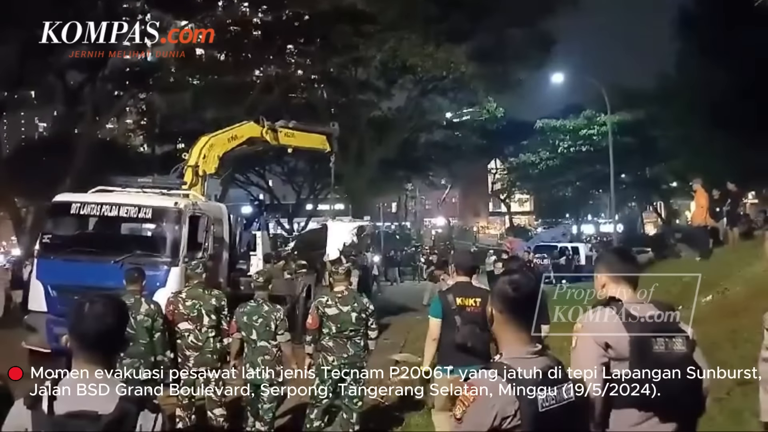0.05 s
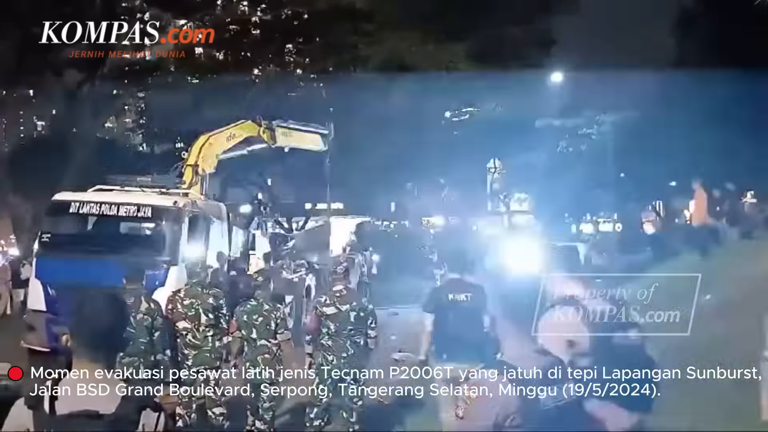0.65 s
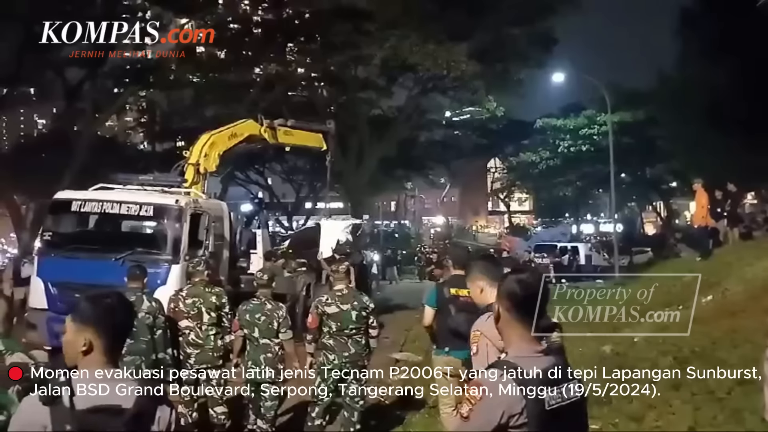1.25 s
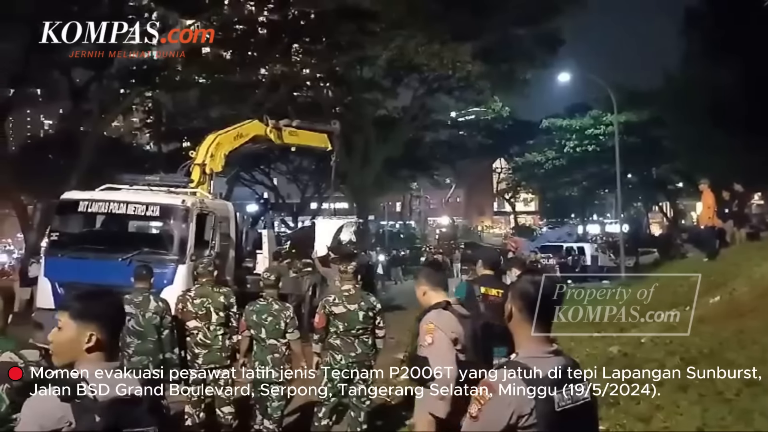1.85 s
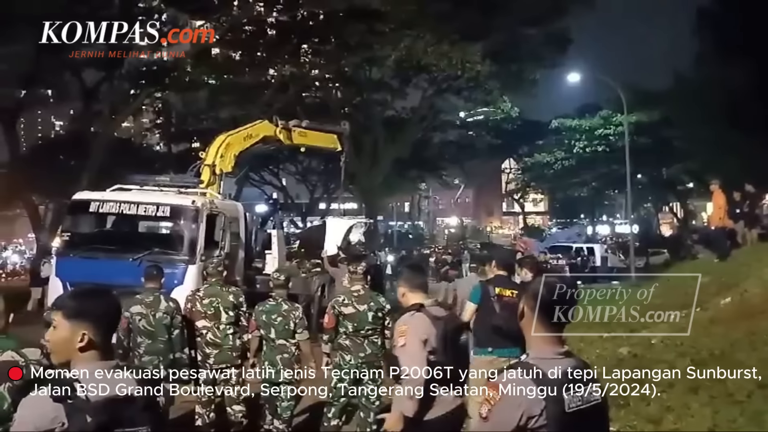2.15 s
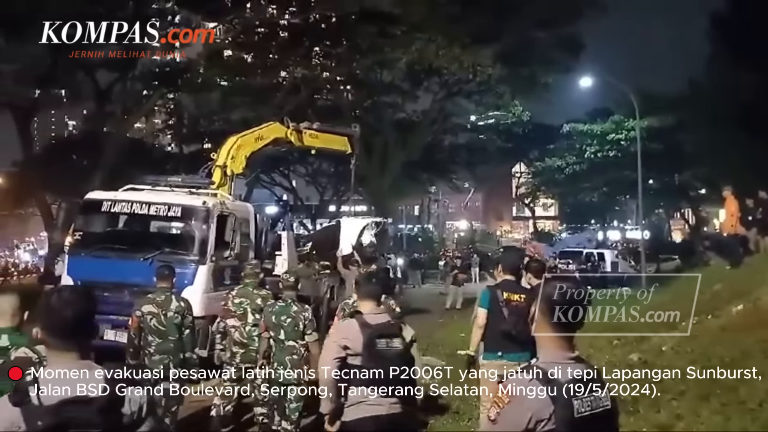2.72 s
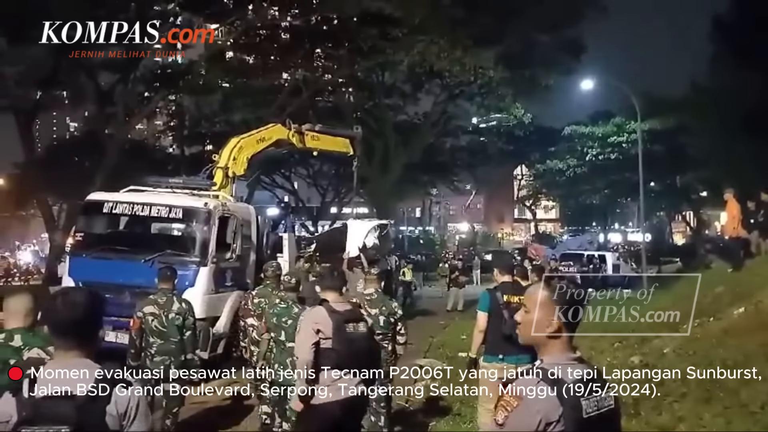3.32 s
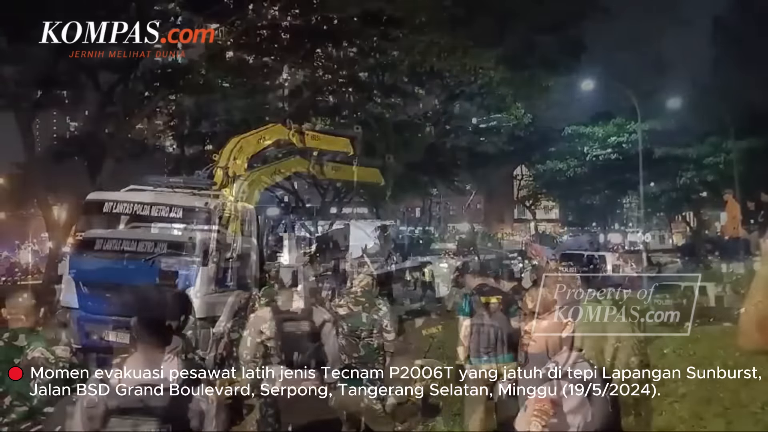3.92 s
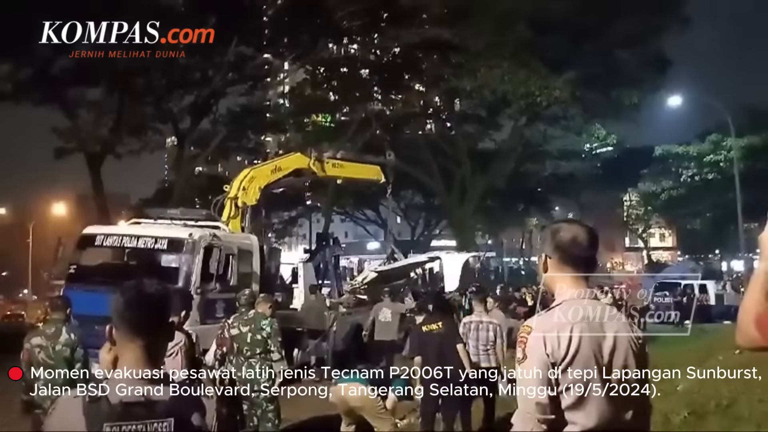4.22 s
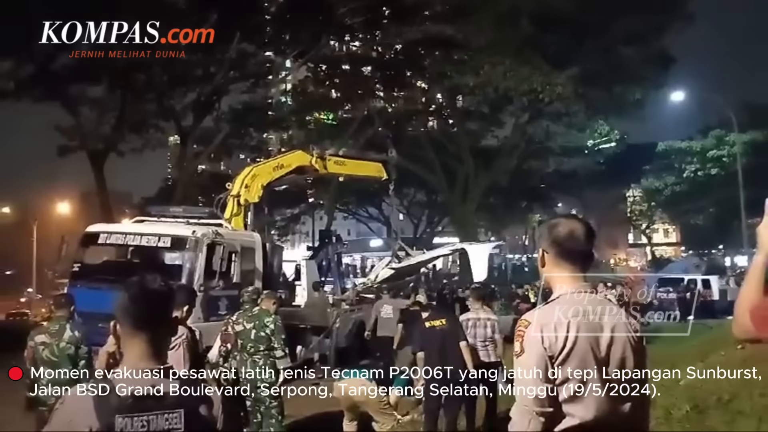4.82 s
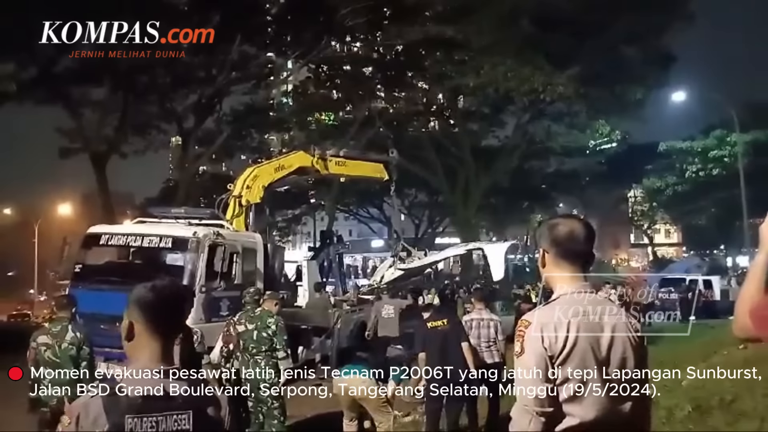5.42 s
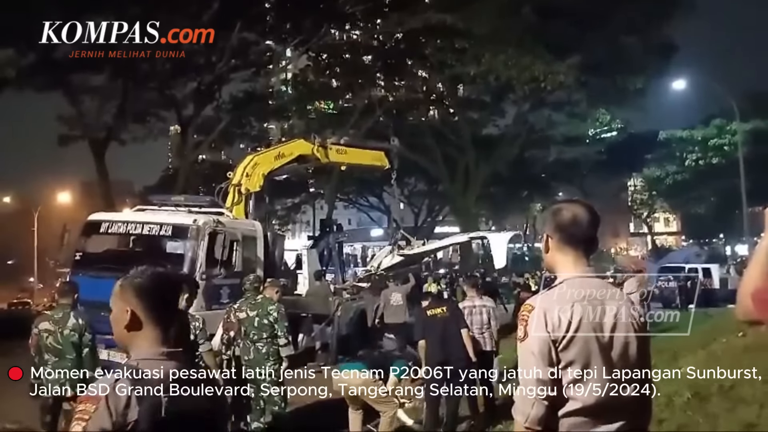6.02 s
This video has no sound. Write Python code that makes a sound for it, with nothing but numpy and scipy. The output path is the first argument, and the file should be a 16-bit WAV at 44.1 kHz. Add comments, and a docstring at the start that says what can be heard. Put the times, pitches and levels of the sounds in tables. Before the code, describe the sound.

Heard outdoors and a little to the right, a diesel truck drones with a booming exhaust, clatter and hiss as its crane lifts wreckage. Thin whistles, a brush of cloth close by, a short squeak and a dull scrape sit under the drone. After a sudden, brief silence, the engine returns from another microphone position, slowed by the load, then regains speed amid another squeak, a scrape and two small clicks.

```python
"""A crane truck's six-cylinder diesel drones at fast idle, slowing under load and picking up again.
The exhaust booms at the firing rate, the block clatters, and the fan and hydraulics hiss. Tones tied to
the crankshaft swell where the truck's panels ring. Valves whistle, the crane squeaks, wreckage scrapes,
and a rustle and two ticks sound close by. It is heard outdoors from one spot, then, after a short
silence, from a second one."""
import sys
import numpy as np
from scipy import signal
from scipy.fft import rfft, irfft, next_fast_len
from scipy.io import wavfile

SR = 44100
rng = np.random.default_rng(int(sys.argv[2]) if len(sys.argv) > 2 else 0)


def pcm_store(signal):
    """Save signal as 16-bit PCM."""
    levels = np.round(np.clip(np.atleast_2d(signal), -1, 1) * 32767)
    wavfile.write(sys.argv[1], SR, levels.astype(np.int16).T)


N = 266981
TIME = np.arange(N) / SR

# which ear hears the truck louder, per spot: f/Hz, left minus right/dB
TRUCK_BALANCE = ([(120, -3.5), (450, -3), (720, -6.0), (1120, -9), (1550, 0.3), (2400, -7), (3500, -9),
                 (6200, -8.5), (7600, -6.4), (11500, -9.5), (14500, 1)], [(120, 1), (450, -5.5), (720, -2),
                 (1120, -7.5), (1550, -2), (2400, -4.5), (3500, -6.5), (6200, -5.5), (7600, -6.5),
                 (11500, -10.5), (14500, -13)])
IDLE_TURNS_PER_S = (39.0, 40.85)   # the crank speed that the governor aims for, per spot


def from_db(db):
    """Turn decibels into a gain."""
    return 10 ** (np.asarray(db) / 20)


def rms_one(x):
    """Scale a signal to an average strength (rms) of 1."""
    return x / np.sqrt(np.mean(x ** 2) + 1e-20)


def in_time(rows):
    """Join a table's timed points with straight lines, one curve per column."""
    times, *columns = np.transpose(rows)
    return [np.interp(TIME, times, column) for column in columns]


def at_hz(points, hz):
    """Read a table between its points, with frequency spaced in octaves."""
    points = np.array(points)
    return np.interp(np.log(hz), np.log(points[:, 0]), points[:, 1])


def pan(balance_db):
    """Left and right gains of constant power; below 0 dB the right is louder."""
    gains = from_db(np.array([[.5], [-.5]]) * balance_db)
    return gains / np.sqrt(np.mean(gains ** 2, axis=0))


def swell(at_s, width_s):
    """A bell-shaped rise and fall."""
    return np.exp(-((TIME - at_s) / width_s) ** 2)


def drift(rate_hz):
    """A smooth random wobble of typical size 1."""
    step = 40   # samples between random values
    pole = np.exp(-2 * np.pi * rate_hz * step / SR)
    noise = rng.standard_normal(N // step + 2002)
    slow = signal.lfilter([1], [1, -2 * pole, pole * pole], noise)[2000:]
    return np.interp(np.arange(N) / step, np.arange(len(slow)), rms_one(slow))


def resonant_noise(hz, sharpness):
    """Noise ringing around one pitch; more sharpness (Q) makes it more like a tone."""
    peak = signal.iirpeak(hz, sharpness, fs=SR)
    return rms_one(signal.lfilter(*peak, signal.lfilter(*peak, rng.standard_normal(N))))


def stereo_noise(spectrum, balance, lead_s=0):
    """Shaped noise, alike in both ears in the bass and unlike in the treble."""
    # how alike the two ears are: f/Hz, likeness (1 = the same)
    likeness = [(130, .99), (290, 0.82), (640, 0.87), (1000, .45), (1500, 0.049), (7000, .02)]
    size = next_fast_len(N)
    hz = np.maximum(np.fft.rfftfreq(size, 1 / SR), 1)
    mid, side = rfft(rng.standard_normal((2, size)))
    alike = at_hz(likeness, hz)
    ears = np.sqrt(1 + alike) * mid + np.sqrt(1 - alike) * side * [[1], [-1]]
    ears[0] *= np.exp(2j * np.pi * hz * lead_s)   # the left ear hears it earlier
    ears *= from_db(at_hz(spectrum, hz)) * pan(at_hz(balance, hz))
    return rms_one(irfft(ears, size)[:, :N])


def valve_whistles():
    """Oil forced through valves makes thin bands of noise that come and go."""
    # whistles: t/s, half length/s, f/Hz, sharpness, level/dB
    whistles = [(1.25, .6, 4640, 55, -46.5), (2.95, 0.35, 4600, 40, -52), (2.6, 0.69, 6400, 24, -46.5),
                (4.6, .45, 12500, 5, -53.5)]
    out = np.zeros((2, N))
    for at_s, width_s, hz, sharpness, db in whistles:
        ears = np.array([resonant_noise(hz, sharpness) for _ in range(2)])
        out += from_db(db) * swell(at_s, width_s) * ears
    return out * pan(-12.5)


def crane_squeaks():
    """The load shifts on the crane with short, falling squeaks."""
    # squeaks: t/s, half length/s, start f/Hz, end f/Hz, level/dB
    squeaks = [(0.236, 0.1, 738, 715, -42.5), (2.552, 0.062, 829, 765, -34.5),
               (4.076, 0.061, 614, 606, -34), (4.09, 0.035, 1560, 1520, -43)]
    out = np.zeros(N)
    for at_s, width_s, start_hz, end_hz, db in squeaks:
        hz = np.interp(TIME, [at_s - width_s, at_s + width_s], [start_hz, end_hz])
        out += from_db(db) * swell(at_s, width_s) * np.sin(2 * np.pi * np.cumsum(hz) / SR)
    return out * pan(-5.5)


def wreckage_scrapes():
    """Wreckage scrapes dully, ringing around two pitches."""
    # scrapes: t/s, half length/s, low f/Hz, high f/Hz, level/dB
    scrapes = [(3.252, 0.019, 473.6, 865, -29.5), (3.291, 0.022, 535, 955, -30.5),
               (4.83, 0.075, 595, 766, -36)]
    out = np.zeros(N)
    for at_s, width_s, low_hz, high_hz, db in scrapes:
        body = resonant_noise(low_hz, sharpness=4.4) + 0.69 * resonant_noise(high_hz, sharpness=4.0)
        out += from_db(db) * swell(at_s, width_s) * rms_one(body)
    return out * pan(-5.0)


def cloth_rustle(at_s, rise_s, decay_s, level_db):
    """A bright brush of cloth on the right that dies away."""
    # tone colour of the cloth: f/Hz, relative level/dB
    spectrum = [(3000, -22.5), (6000, 0), (9000, -8), (12000, 2), (15000, -9), (18000, -17)]
    age = np.maximum(TIME - at_s, 0)
    shape = np.minimum(age / rise_s, 1) * np.exp(-age / decay_s)
    return from_db(level_db) * shape * stereo_noise(spectrum, balance=[(3000, -9), (15000, -17.5)])


def ticks(width_s, sharpness):
    """Tiny dry clicks, each a flash of ringing noise."""
    # clicks close by: t/s, level/dB, f/Hz, left minus right/dB
    clicks = [(4.7626, -28.5, 12600, -15), (4.873, -29, 6900, -7.5)]
    return sum(from_db(db) * swell(at_s, width_s) * resonant_noise(hz, sharpness) * pan(balance_db)
               for at_s, db, hz, balance_db in clicks)


def fan_hiss(spot, flutter_db):
    """The fan and hydraulics hiss with a slight, quick flutter."""
    # tone colour of the hiss, per spot: f/Hz, relative level/dB
    spectra = ([(760, -30), (1300, -5), (1580, -4.5), (2090, -2.5), (2600, -2.5), (2950, -6.5),
               (3450, -2.5), (4050, -4.5), (4520, 0), (5100, -4), (5800, -2.5), (6500, -4), (7700, -9),
               (8450, -16), (10200, -16.5), (11300, -11), (13000, -14), (14100, -25.5), (15600, -25)],
               [(760, -26), (1300, -1), (1550, -0.5), (2200, -2.5), (2450, 0), (3240, -4), (3800, -3.5),
               (4200, 1), (5060, -5.5), (7600, -8), (9000, -14.5), (10400, -16), (11700, -7.5), (12800, -5),
               (14200, -16), (15600, -26)])
    return stereo_noise(spectra[spot], TRUCK_BALANCE[spot]) * from_db(flutter_db * drift(60))


def block_clatter(turns, spot, decay_firings, cylinder_db, chance_db):
    """Each firing knocks the engine block; each of the six cylinders has its own strength."""
    # tone colour of the block: f/Hz, relative level/dB at the first spot, at the second
    spectra = [(14.9, -26, -16), (30.05, -18, -16), (45, -0.5, -1.5), (70, -3.5, -10), (121, 2, 2.5),
               (203, -0.5, -3.5), (270, -6, -5.5), (412, -1.5, -5), (526, -6, -18.5), (676, -10, -7),
               (836, -8.5, -13), (1116, -9, -15.5), (1426, -23.5, -28), (2200, -40, -40)]
    spectrum = np.array(spectra)[:, [0, 1 + spot]]
    block = stereo_noise(spectrum, TRUCK_BALANCE[spot], lead_s=(.00014, .00002)[spot])
    firing, since_firing = np.divmod(3 * turns, 1)
    firing = firing.astype(int)
    cylinders = rng.standard_normal(6)
    strength_db = cylinder_db * rms_one(cylinders - cylinders.mean())[firing % 6]
    strength_db += chance_db * rng.standard_normal(1000)[firing]
    return block * rms_one(from_db(strength_db) * np.exp(-since_firing / decay_firings))


def panel_lift_db(hz, spot):
    """The truck's panels boost a tone that comes near a pitch they ring at."""
    # ringing panels, per spot: f/Hz, half width/Hz, boost/dB
    panels = ([(220, 4.2, 4.5), (409, 10, 7), (711.7, 11, 12.5)], [(218.6, 7.8, 12.5), (284, 15, 9.5),
              (336.5, 23, 9.5), (395.4, 17, 13.5), (430.3, 9.9, 11), (700, 16, 7)])
    return sum(lift_db * np.exp(-((hz - centre_hz) / width_hz) ** 2)
               for centre_hz, width_hz, lift_db in panels[spot])


def crank_tones(turns, speed, spot, waver_db, wander_rad):
    """Unequal cylinders make wavering tones near whole and half multiples of the crank speed."""
    # tones: multiple of the crank speed, level/dB at the first spot, at the second
    tones = [(2.016, -46, -51), (2.5, -46.5, -50), (3.5, -42, -40.5), (4.014, -34, -34), (4.52, -48, -46.5),
             (4.99, -50.5, -45.5), (5.55, -50, -57), (6.02, -42.5, -39), (6.53, -52, -61),
             (6.99, -50, -48.5), (7.514, -46, -51), (8.07, -48.5, -52), (9.02, -41, -45.5),
             (10.01, -46, -49.5), (10.515, -49.5, -55.5), (10.99, -44, -50.5), (11.51, -48.5, -64),
             (11.92, -49, -68), (12.97, -51, -63), (15.07, -48, -50), (17.1, -63.5, -55), (17.95, -58, -57),
             (19, -56, -56.5), (23.06, -54.5, -56.5), (25.8, -58, -66), (28.3, -56, -71)]
    out = np.zeros((2, N))
    for multiple, *level_db in tones:
        phase = 2 * np.pi * (multiple * turns + rng.random()) + wander_rad * drift(3.8)
        gain = from_db(level_db[spot] + panel_lift_db(multiple * speed, spot) + waver_db * drift(2.8))
        balance_db = at_hz(TRUCK_BALANCE[spot], multiple * IDLE_TURNS_PER_S[spot])
        out += np.sqrt(2) * np.sin(phase) * gain * pan(balance_db)
    return out


def exhaust_boom(turns, waver_db):
    """The silencer smooths three firings a turn into a nearly pure tone."""
    firing_tone = np.sqrt(2) * np.sin(2 * np.pi * 3 * turns)
    return firing_tone * from_db(waver_db * drift(9.7)) * pan(-3)


def crank_speed(spot, slowest_after_s):
    """Turns per second: a load slows the engine quickly, and its governor recovers more slowly."""
    # the crane takes up a load, per spot: t/s, deepest drop in speed/(turns per s)
    loads = ([(0.02, 2.0), (1.55, 0.25)], [(3.7, 4.95), (5.55, 0.45)])
    speed = IDLE_TURNS_PER_S[spot]
    for at_s, drop in loads[spot]:
        age = np.maximum(TIME - at_s, 0) / slowest_after_s
        speed -= drop * (age * np.exp(1 - age)) ** 2
    return speed * (1 + 0.00094 * drift(7.8))   # the governor never holds quite still


def truck(spot):
    """The diesel from spot 0 or 1: boom, tones and clatter follow one crankshaft, over the hiss."""
    # loudness, per spot: t/s, boom level/dB, clatter level/dB, hiss level/dB
    levels = ([(0.1, -13, -31.5, -36), (0.24, -15, -32.5, -36.5), (0.45, -14, -34, -36.8),
              (0.8, -13.5, -33.5, -37), (1.5, -13.5, -32, -36), (2.3, -13, -33.5, -36),
              (2.9, -13.4, -34.5, -36.5), (3.79, -13.9, -33, -36.5)], [(4.05, -17, -32.5, -40),
              (4.18, -12.5, -30.5, -38), (4.45, -13, -32, -39), (4.78, -11.5, -31.5, -39),
              (5.1, -12, -34, -41), (5.5, -13, -34, -41.5), (6.05, -14.5, -35.5, -41.5)])
    boom_gain, clatter_gain, hiss_gain = from_db(in_time(levels[spot]))
    speed = crank_speed(spot, slowest_after_s=0.43)
    turns = np.cumsum(speed) / SR
    boom = boom_gain * exhaust_boom(turns, waver_db=0.29)
    tones = crank_tones(turns, speed, spot, waver_db=1.8, wander_rad=0.24)
    clatter = clatter_gain * block_clatter(turns, spot, decay_firings=2.0, cylinder_db=0.5, chance_db=0.6)
    hiss = hiss_gain * fan_hiss(spot, flutter_db=0.46)
    return boom + tones + clatter + hiss


def scene():
    """The sound stops dead at the first spot, then fades in quickly at the second."""
    stop_s, fade_out_s, resume_s, fade_in_s = 3.797, 0.0042, 4.045, 0.031
    around = valve_whistles() + crane_squeaks() + wreckage_scrapes()
    around += cloth_rustle(2.19, rise_s=0.026, decay_s=.13, level_db=-38.5)
    around += ticks(width_s=.0009, sharpness=4.0)
    first_fade = np.clip((stop_s - TIME) / fade_out_s, 0, 1)
    second_fade = np.clip((TIME - resume_s) / fade_in_s, 0, 1)
    return (truck(0) + around) * first_fade + (truck(1) + around) * second_fade


def record(dry):
    """A steep filter removes the very highest treble."""
    cutoff_hz = 15750
    return signal.sosfilt(signal.ellip(14, .1, 90, cutoff_hz, fs=SR, output="sos"), dry)


dry = scene()
out = record(dry)
pcm_store(out)
```